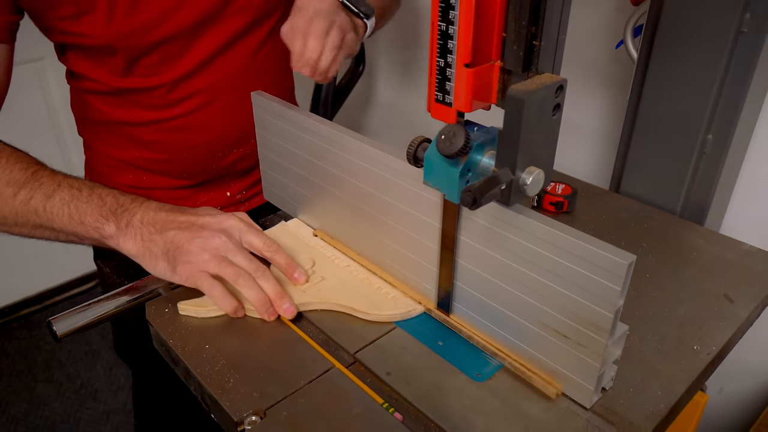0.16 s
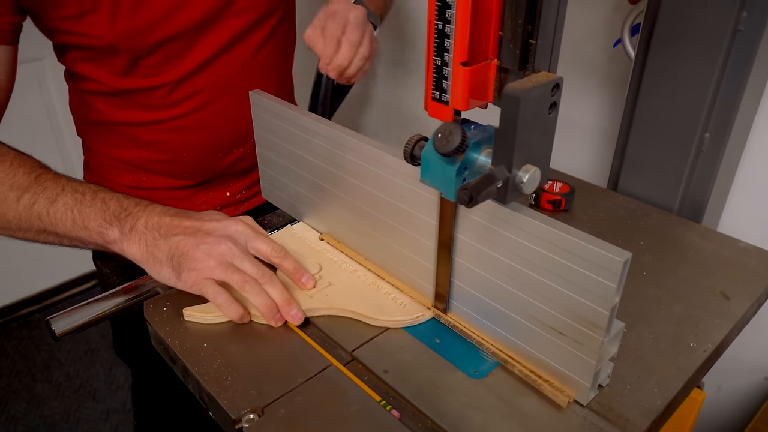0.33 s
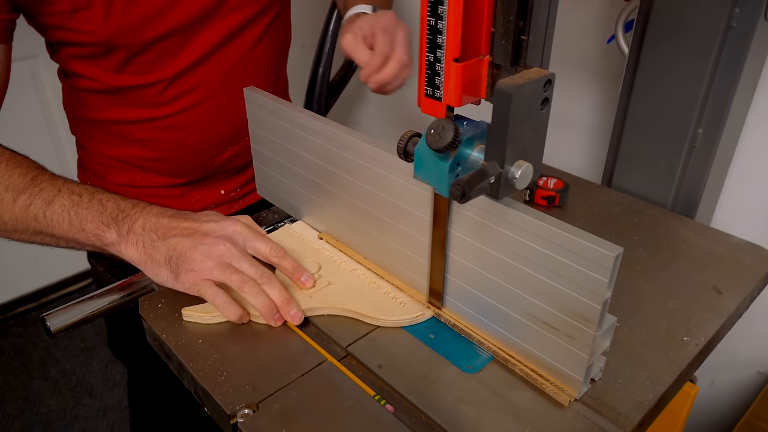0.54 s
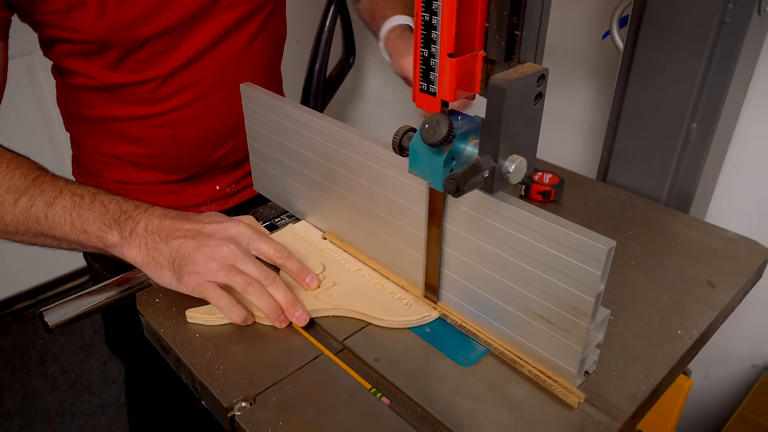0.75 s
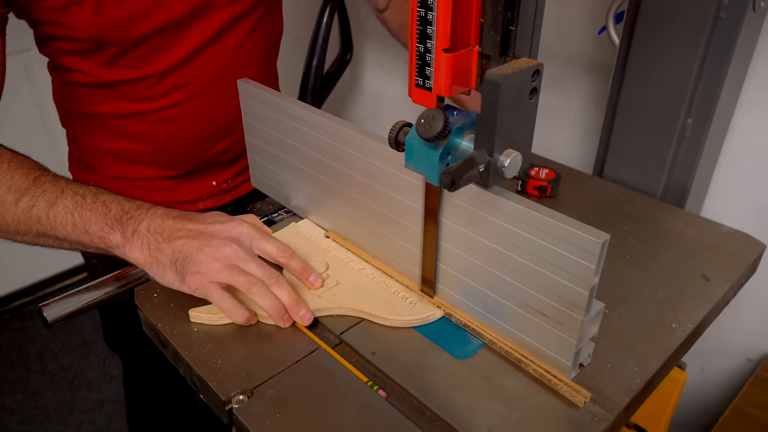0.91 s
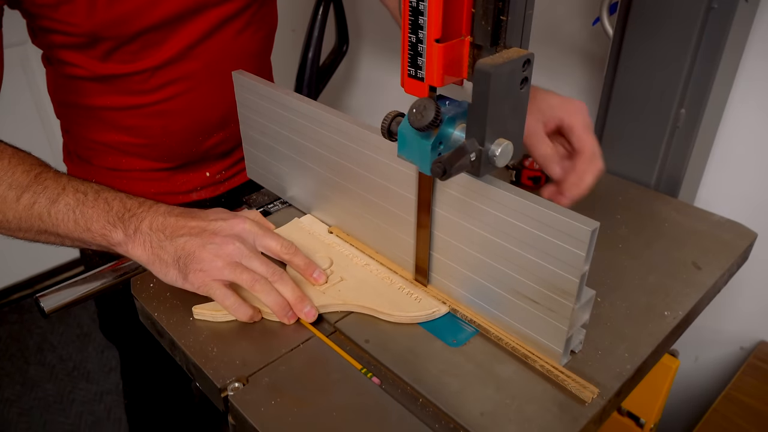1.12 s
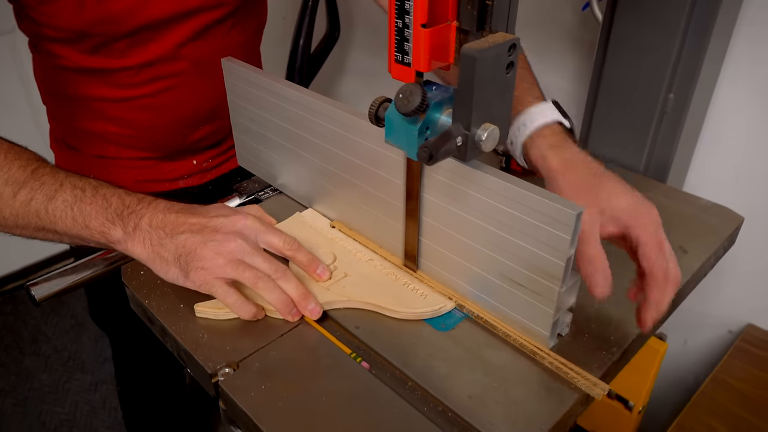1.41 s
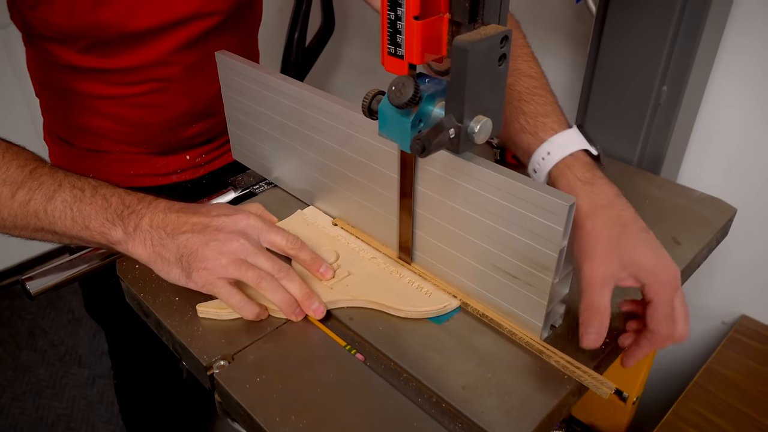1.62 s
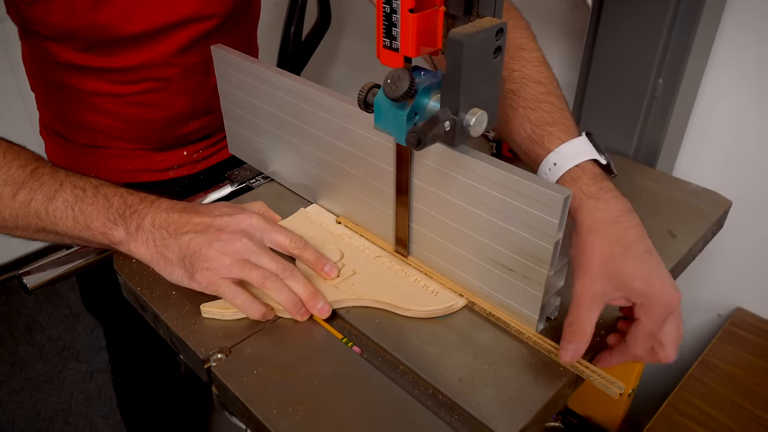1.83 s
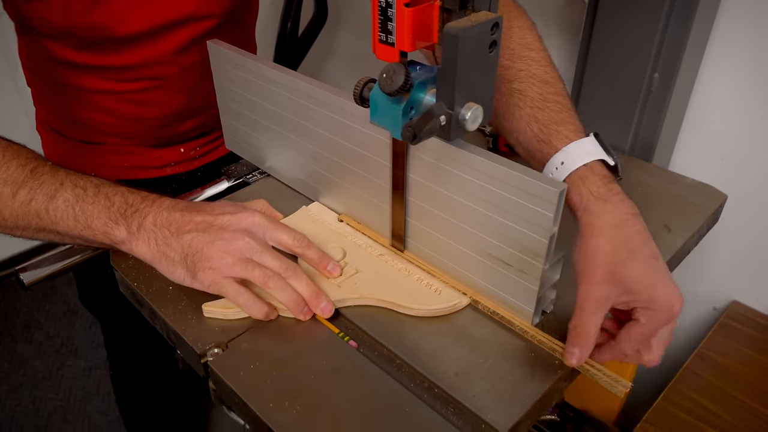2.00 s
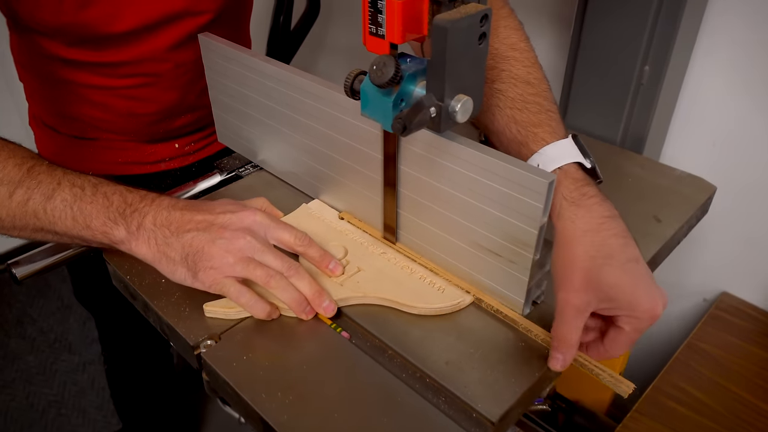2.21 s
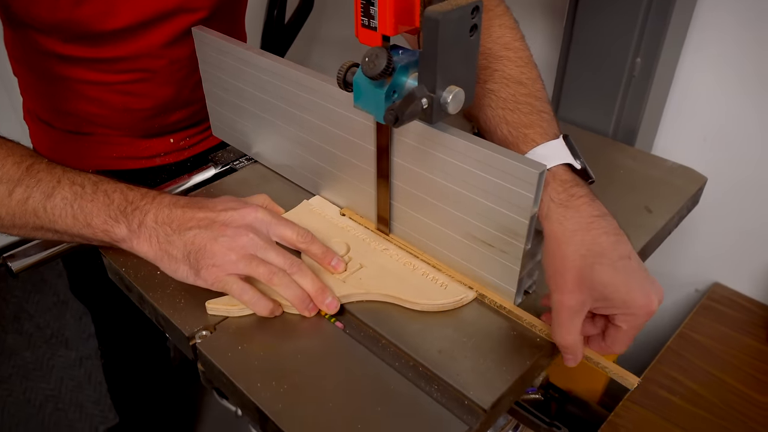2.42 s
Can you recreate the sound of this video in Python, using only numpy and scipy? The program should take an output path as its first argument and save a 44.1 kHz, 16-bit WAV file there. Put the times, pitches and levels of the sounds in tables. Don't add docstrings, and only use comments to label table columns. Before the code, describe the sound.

A bandsaw rips a thin wooden strip with a steady, harsh, buzzing whine and throbbing rasp

```python
import sys
import numpy as np
from scipy import signal
from scipy.io import wavfile
from scipy.ndimage import uniform_filter1d

SR = 44100
rng = np.random.default_rng(int(sys.argv[2]) if len(sys.argv) > 2 else 0)


def elevation(decibels):
    levels = np.asarray(decibels, float)
    return 10 ** (levels / 20)


def put_to_file(sound):
    columns = np.atleast_2d(sound).T
    safe = np.clip(columns, -1, 1)
    whole_steps = np.round(safe * 32767)
    wavfile.write(sys.argv[1], SR, whole_steps.astype(np.int16))


N = 112454
TIME = np.arange(N) / SR


def evened(x):
    return x / np.sqrt(np.mean(x ** 2) + 1e-20)


def window(t, middle_s, length_s):
    return np.exp(-(2 * (t - middle_s) / length_s) ** 4)


def read(points, hz):
    point_hz, value = np.transpose(points)
    return np.interp(np.log(hz + 1), np.log(point_hz + 1), value)


def drift(per_s, count):
    t = np.arange(0, N + 64, 64) / SR
    start = rng.random((count, 16, 1))
    hz = np.geomspace(.06, 1, 16)[:, None] * per_s
    slow = np.sin(2 * np.pi * (hz * t + start)).sum(1) / np.sqrt(8)
    return np.array([np.interp(TIME, t, row) for row in slow])


def shaped(x, field):
    hz, t, z = signal.stft(x, SR, nperseg=1024, noverlap=768)
    z = z * elevation(field(hz[:, None], t))
    return signal.istft(z, SR, nperseg=1024, noverlap=768)[1][:N]


def blade_turns():
    # start_s, rate_hz
    tooth_rate = [
        (0, 338.4),
        (.12, 338.9),
        (.35, 338.9),
        (.6, 339.15),
        (1.7, 339.17),
        (2.55, 339.25),
    ]
    wander = 1 + .00012 * drift(per_s=3, count=1)[0]
    return np.cumsum(np.interp(TIME, *np.transpose(tooth_rate)) * wander) / SR


def teeth(turns):
    # multiple of the tooth rate, level_db
    low_partials = [(1, -46), (2, -19.5), (3, -24), (4, -17.5), (5, -26), (6, -25), (7, -24), (8, -27),
                    (9, -17), (10, -22), (11, -18), (12, -24), (13, -24), (14, -33), (15, -21), (16, -34),
                    (17, -23), (18, -30), (19, -17), (20, -25), (21, -27), (22, -27), (23, -25)]
    # multiple of the tooth rate, level_db
    high_partials = [(24, -21), (25, -31), (26, -33), (27, -33), (28, -21), (29, -31), (30, -33), (31, -34),
                     (32, -21), (33, -28), (34, -27), (35, -31), (36, -34), (37, -34), (38, -40), (39, -37),
                     (40, -47), (41, -44), (42, -55), (43, -40), (44, -55), (45, -48)]
    # multiple, middle_s, length_s, gain_db
    low_singing = [(1, 2, 1.5, 8), (2, .5, 1, -10), (3, .08, .25, -6), (3, 1.2, .65, 8), (4, .57, 1, 7),
                   (5, .5, 1.4, 4), (5, 1.8, .2, 5), (6, .25, .32, 15), (6, .55, .3, 5), (6, 1.26, .1, 10),
                   (6, 2.1, .25, -6), (7, .65, .55, -5), (7, 1.3, .6, 7), (8, .5, .95, 8), (8, .35, .12, 5),
                   (8, .65, .16, 5), (9, .07, .25, -12), (9, .7, .3, 4), (9, 1.75, .55, -6),
                   (9, 2.3, .4, 3), (10, .02, .15, -10), (10, .5, .5, 4), (10, 1.5, .5, -5),
                   (10, 2.42, .3, -7), (11, .1, .32, -10), (11, .64, .2, 8), (11, 1, .25, -4),
                   (11, 1.3, .16, 4), (11, 1.7, .45, 7), (11, 2.2, .35, -7), (12, 1.7, .75, -12),
                   (13, .65, .65, 11), (13, 2.07, .36, 8), (15, .55, .3, -8), (15, 1.7, .3, 3),
                   (15, 2.4, .5, 5), (16, .9, .3, 9), (17, .33, .09, 13), (17, .7, .2, -6),
                   (17, .95, .22, 14), (17, 1.5, .25, 5), (17, 2.05, .55, -12)]
    # multiple, middle_s, length_s, gain_db
    high_singing = [(19, .75, .3, 4), (19, 2, .2, -9), (20, .35, .12, 8), (20, 1.1, .65, 12),
                    (20, 1.72, .5, 6), (21, 1.1, .6, 11), (21, 1.95, 1, 6), (22, .9, .4, 11),
                    (22, 2.1, .2, 8), (23, .85, .3, 10), (24, .1, .4, 4), (24, .5, .2, -6),
                    (24, .82, .32, 8), (24, 1.82, .3, 6), (24, 2.27, .36, 8), (25, 2.2, .28, 16),
                    (26, 1.9, 1.1, 18), (28, .15, .3, -9), (28, .9, .2, 5), (28, 1.1, .2, -11),
                    (28, 2., 1.5, 12), (30, 1.8, .4, 15), (30, 2.25, .3, 15), (31, 1.3, .4, 9),
                    (32, .15, .3, -10), (32, .47, .15, -9), (32, 2.06, .33, 10), (32, 2.35, .1, -7),
                    (32, 2.48, .12, 7), (33, .15, .4, -8), (33, 2., .3, 9)]
    drift_db, drift_per_s, late_top_db = 1.7, 24, 10.5
    slip_rad, slip_per_s = .48, 12
    scatter_turns = .78

    rows = np.array(list(low_partials) + list(high_partials))
    count = len(rows)
    level = rows[:, 1:] + drift_db * drift(drift_per_s, count)
    level[34:] += late_top_db * window(TIME, 1.78, .97)
    for multiple, middle_s, length_s, gain_db in list(low_singing) + list(high_singing):
        level[round(multiple) - 1] += gain_db * window(TIME, middle_s, length_s)

    start = scatter_turns * rng.random((count, 1))
    slip = slip_rad * drift(slip_per_s, count) * (1 + np.exp(-rows[:, :1] / 8))
    order = np.arange(1, count + 1)[:, None]
    phase = 2 * np.pi * (order * turns + start) + slip
    return np.sqrt(2) * (elevation(level) * np.cos(phase)).sum(0)


def tearing(turns):
    # frequency_hz, density_db (per Hz)
    early_spectrum = [(180, -34), (300, -21), (1150, -10), (1340, -11.5), (1550, -9.5), (2990, -8),
                      (7630, -11), (11100, -11.5), (15200, -36)]
    # frequency_hz, density_db (per Hz)
    late_spectrum = [(180, -41), (300, -30), (682, -11), (858, -10.5), (1340, -4.5), (6060, -11),
                     (9760, -4), (12700, -9.5), (15200, -45)]
    change_s, change_length_s, tooth_gate, splinter_db = 1.36, .14, .25, 3

    splinters = evened(uniform_filter1d(rng.standard_normal(N), size=40))
    grain = rng.standard_normal(N) * elevation(splinter_db * splinters)
    grain *= 1 + tooth_gate * np.cos(2 * np.pi * turns)

    def colour(hz, t):
        late = np.clip((t - change_s) / change_length_s + .5, 0, 1)
        return read(early_spectrum, hz) * (1 - late) + read(late_spectrum, hz) * late

    x = shaped(grain, colour)
    return x / np.sqrt(uniform_filter1d(x ** 2, size=16000) + 1e-20)


def ringing(hz, t):
    # middle_s, length_s, pitch_hz, width_hz, gain_db
    modes = [(0.12, 0.56, 5970, 900, 11), (0.21, 0.22, 4630, 600, 9), (0.12, 0.86, 2030, 920, 7.5),
             (0.2, 0.13, 1200, 67, 8), (0.23, 0.45, 7640, 1100, 8), (0.63, 0.21, 2440, 600, 6.5),
             (0.66, 0.16, 3100, 1500, 0.5), (1.28, 0.3, 1260, 74, 5), (0.87, 0.64, 7600, 920, 11.5),
             (1.02, 0.17, 5230, 1100, 8), (1.56, 1.5, 6950, 370, 8), (1.18, 0.69, 1900, 1200, 5.5),
             (1.8, 0.63, 3730, 78, 12.5), (1.6, 0.5, 9000, 470, 3), (1.856, 0.19, 9900, 1200, 9.5),
             (2.03, 0.25, 10900, 780, 12), (2.13, 0.39, 8660, 890, 6.5), (2.32, 0.3, 9540, 620, 7),
             (2.05, 0.46, 5770, 240, -13), (2.25, 0.41, 2850, 650, -6.5), (1.95, 0.76, 4860, 800, 8.5),
             (.95, 0.89, 8500, 650, -6), (1.66, 0.3, 6940, 600, -11), (0.12, 0.56, 12800, 500, 6),
             (0.37, 0.16, 3500, 1400, 3), (1.42, 0.42, 1600, 250, -10), (1.7, 6.5, 950, 250, -2),
             (1.3, 1.3, 1017, 79, -6)]
    patch = rng.standard_normal((len(hz), len(t)))
    patch = uniform_filter1d(patch, size=5, axis=0)
    patch = uniform_filter1d(patch, size=24, axis=1)
    gain = 2.8 * evened(patch)
    for middle_s, length_s, pitch_hz, width_hz, gain_db in modes:
        peak = 1 / (1 + (2 * (hz - pitch_hz) / width_hz) ** 2)
        gain = gain + gain_db * window(t, middle_s, length_s) * peak
    return gain


def wheel_throb():
    # wheel order, depth_db, crest_s
    runout = [(3, 2.6, .018), (4, .8, .0071), (5, .9, .008), (6, .5, .018)]
    wheel_hz, crest_limit_db = 16.73, 3.2
    throb = sum(depth_db * np.cos(2 * np.pi * order * wheel_hz * (TIME - crest_s))
                for order, depth_db, crest_s in runout)
    throb = throb * (1 + .85 * window(TIME, .58, .32))
    crests = crest_limit_db * np.tanh(throb / crest_limit_db)
    return 1.25 * np.where(throb > 0, crests, throb)


def knot_jolts():
    # middle_s, gain_db
    hard_grain = [(.28, 3), (.875, 2), (1.155, 2), (1.252, 3), (1.275, 3.5), (1.335, 3), (1.464, 4),
                  (1.476, 6.5), (1.79, 4), (1.805, 4), (1.82, 4), (1.948, 5), (2.187, 3), (2.39, 2)]
    width_s = .009
    return sum(gain_db * np.exp(-((TIME - middle_s) / width_s) ** 2)
               for middle_s, gain_db in hard_grain)


def knot_thuds(knots):
    band = signal.butter(2, [650, 3200], "band", fs=SR, output="sos")
    thud = signal.sosfilt(band, rng.standard_normal(N))
    return evened(thud) * (elevation(knots) - 1) * elevation(-2)


def cut():
    # start_s, bite level_db
    feed = [(0, -26.5), (.1, -24.5), (.28, -24), (.3, -27.5), (.385, -23.5), (.45, -28), (.47, -33.5),
            (.53, -32.5), (.56, -27), (.72, -27), (.75, -29), (.86, -24), (.89, -28), (1.02, -24),
            (1.06, -28), (1.16, -25.5), (1.31, -28), (2.55, -27)]
    teeth_db, tear_db = 1, -2.1
    teeth_throb, tear_throb = 1.16, .53
    judder_db, judder_per_s = .9, 70

    turns = blade_turns()
    throb = wheel_throb()
    knots = knot_jolts()
    tear = shaped(tearing(turns), ringing)
    tear = tear / np.sqrt(uniform_filter1d(tear ** 2, size=6000))
    x = teeth(turns) * elevation(teeth_db + teeth_throb * throb)
    x += tear * elevation(tear_db + tear_throb * throb + .5 * knots)
    x += knot_thuds(knots)
    judder = judder_db * drift(judder_per_s, count=1)[0]
    return x * elevation(np.interp(TIME, *np.transpose(feed)) + judder)


def motor():
    # frequency_hz, level_db
    hum_lines = [(100, -70.5), (120, -60.5), (217, -65), (250, -54.5), (267, -65), (450, -58.5),
                 (480, -52.5), (630, -62), (735, -56)]
    # frequency_hz, density_db (per Hz)
    rumble_spectrum = [(15, -67), (25, -21), (236, -0.5), (374, -8.5), (456, 0.5), (738, -4), (1080, -49),
                       (1370, -11), (3000, -16), (3900, -47), (6600, -120)]
    hum_drift_db, hum_rise_db, noise_rise_db = 1.8, 3, 3.9
    rumble_db, case_db = -52, -54
    case_hz, case_width_hz = 249.1, 15.5

    rows = np.array(hum_lines)
    progress = TIME / TIME[-1]
    level = rows[:, 1:] + hum_drift_db * drift(2.73, count=len(rows)) + hum_rise_db * progress
    phase = 2 * np.pi * (rows[:, :1] * TIME + rng.random((len(rows), 1)))
    hum = np.sqrt(2) * (elevation(level) * np.cos(phase)).sum(0)

    rumble = evened(shaped(rng.standard_normal(N), lambda hz, t: read(rumble_spectrum, hz)))
    resonance = signal.iirpeak(case_hz, case_hz / case_width_hz, fs=SR)
    case = evened(signal.lfilter(*resonance, rng.standard_normal(N)))
    noise = elevation(rumble_db) * rumble + elevation(case_db) * case
    noise *= elevation(noise_rise_db * (progress - .5))
    early_dip = -5 * window(TIME, .05, .65)
    return elevation(early_dip) * (hum + noise)


def workshop(x):
    t60_s, level_db = .2, -15
    t = np.arange(SR // 2) / SR
    tail = rng.standard_normal(len(t)) * elevation(-60 * t / t60_s) * (t > .005)
    return elevation(level_db) * signal.fftconvolve(x, tail / np.linalg.norm(tail))[:N]


def scene():
    saw = cut()
    return (saw + workshop(saw) + motor())[None]


def top_cut(x):
    return signal.sosfilt(signal.butter(12, 15600, fs=SR, output="sos"), x)


def record(dry):
    ceiling, top_hz, low_cut_hz = .3, 14200, 50
    limited = ceiling * np.tanh(dry / ceiling)
    low_pass = signal.butter(8, top_hz, fs=SR, output="sos")
    high_pass = signal.butter(2, low_cut_hz, "high", fs=SR, output="sos")
    mix = signal.sosfilt(np.vstack([low_pass, high_pass]), limited)
    return top_cut(mix)


dry = scene()
out = record(dry)
put_to_file(out)
```